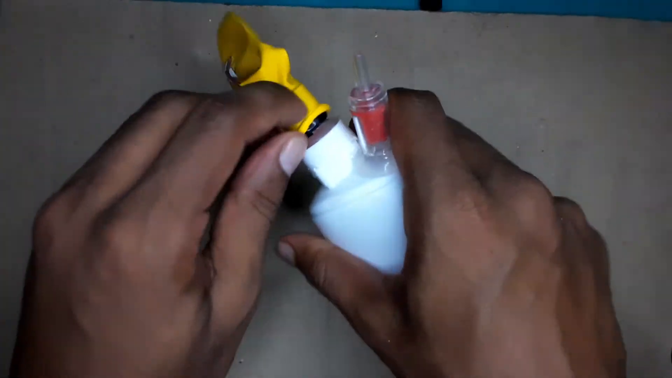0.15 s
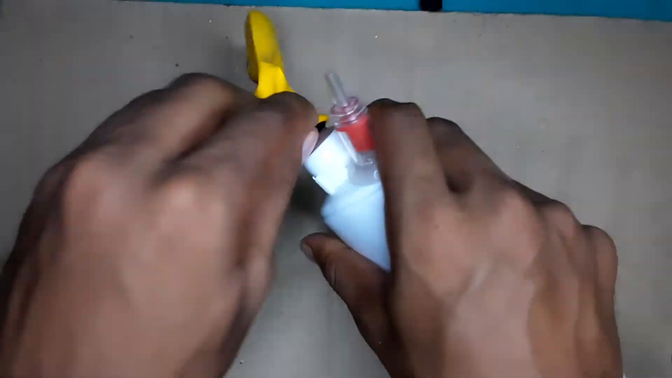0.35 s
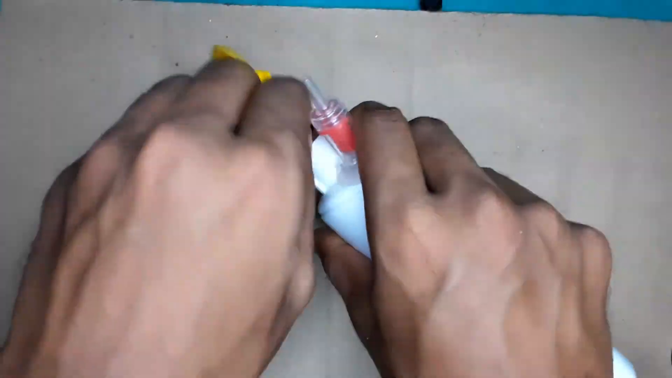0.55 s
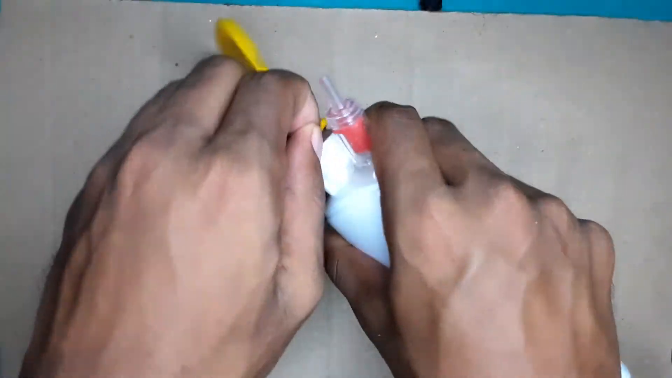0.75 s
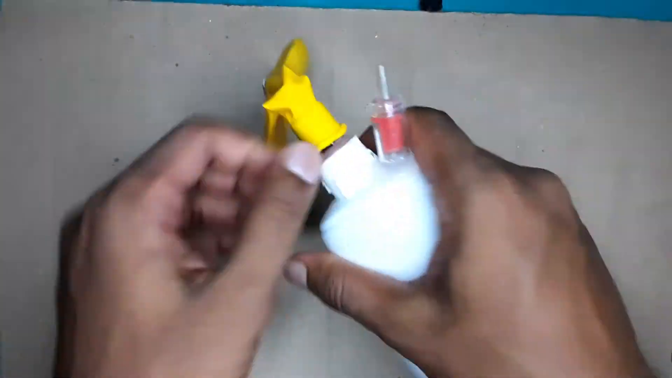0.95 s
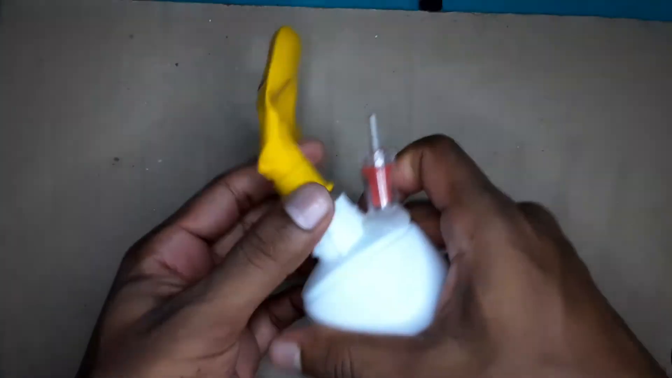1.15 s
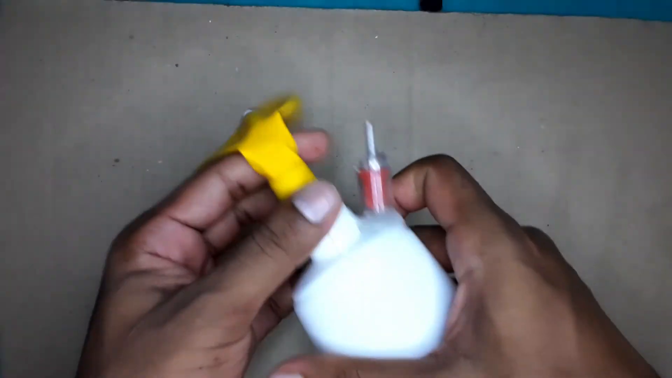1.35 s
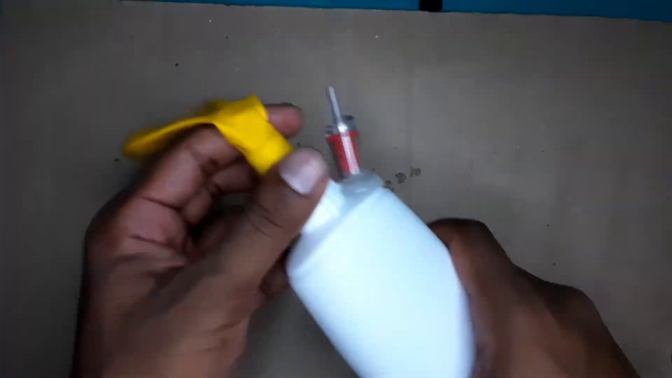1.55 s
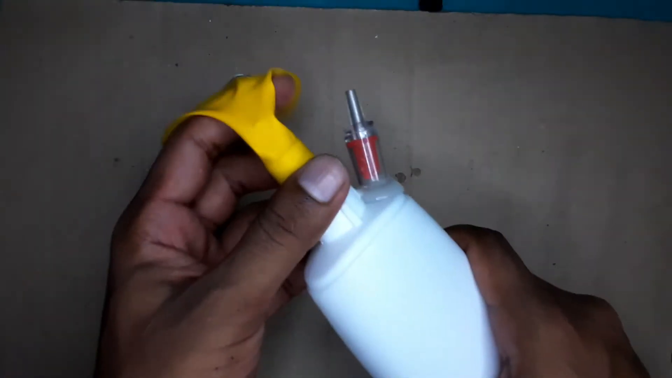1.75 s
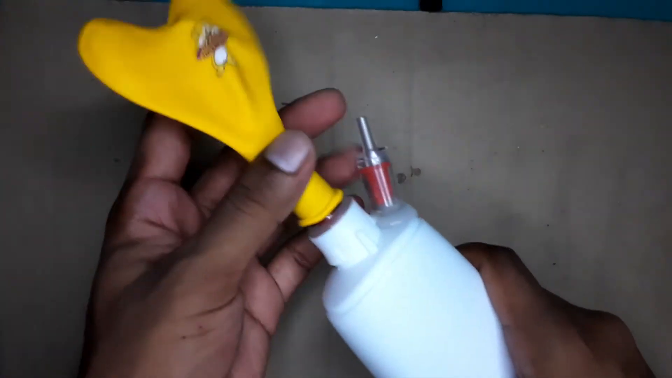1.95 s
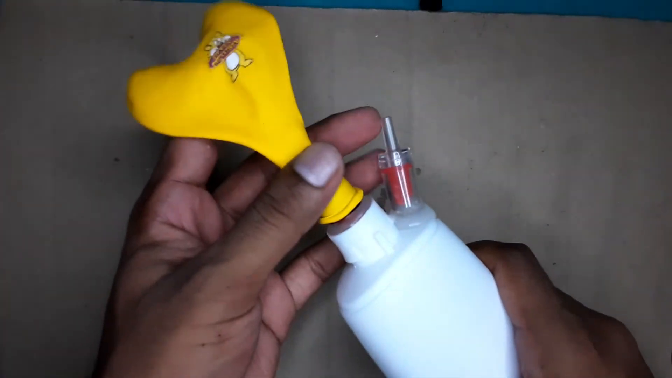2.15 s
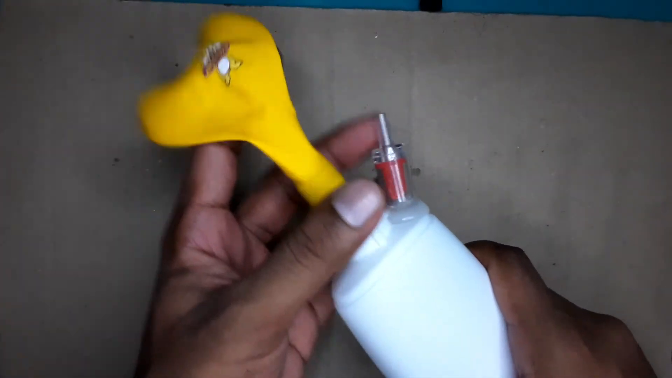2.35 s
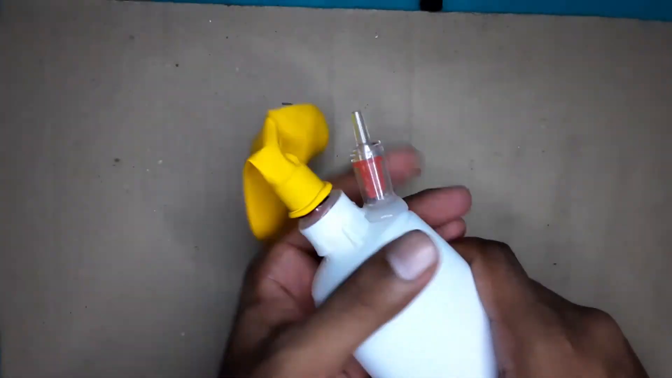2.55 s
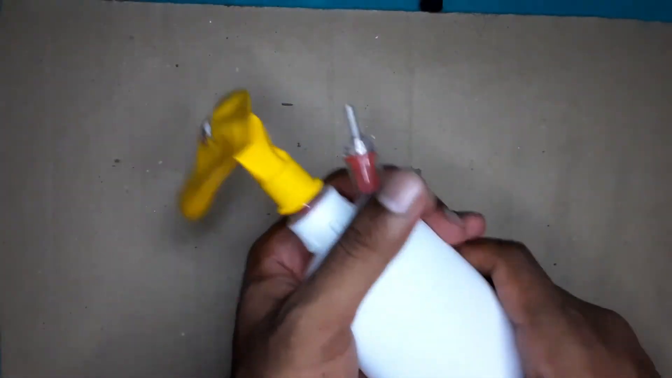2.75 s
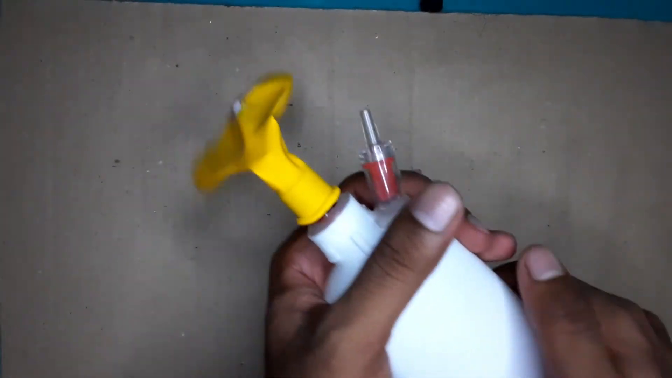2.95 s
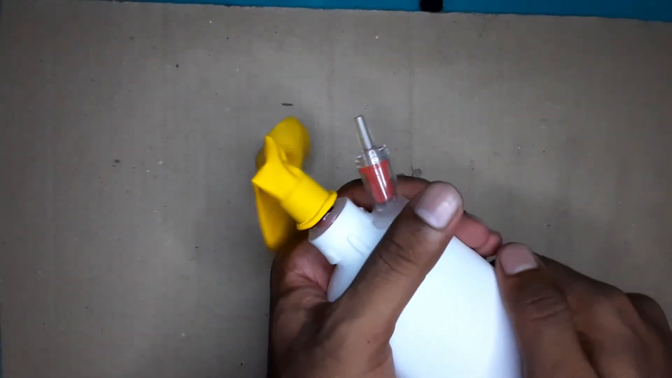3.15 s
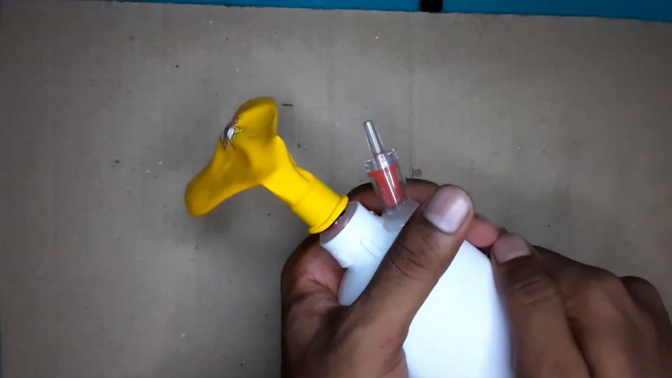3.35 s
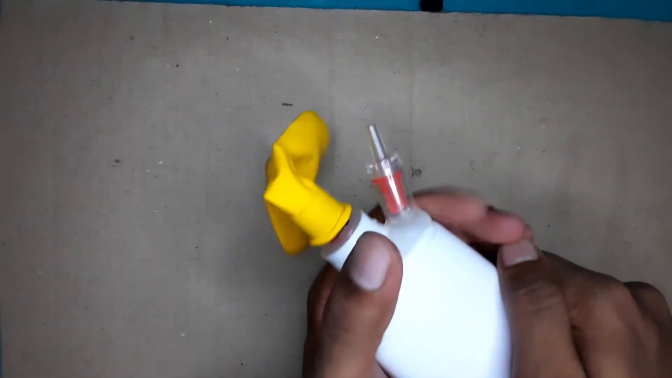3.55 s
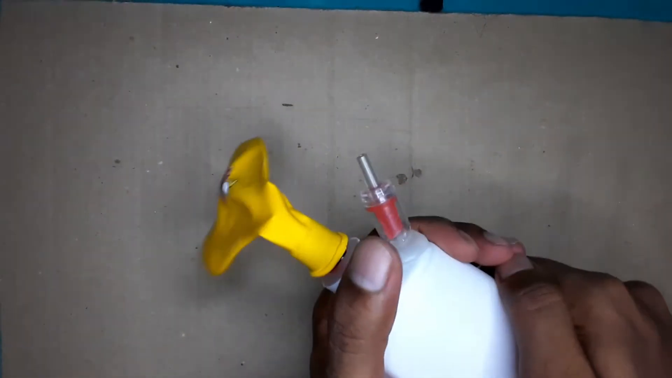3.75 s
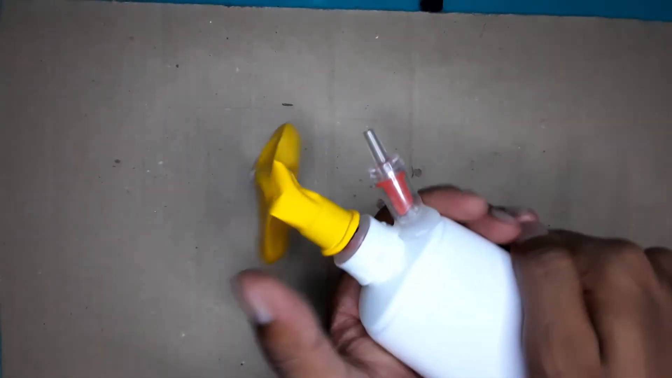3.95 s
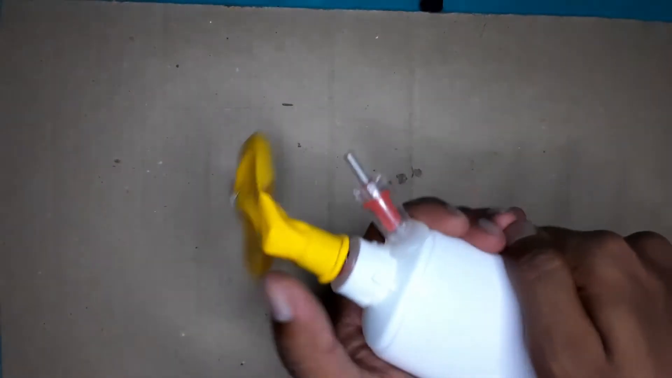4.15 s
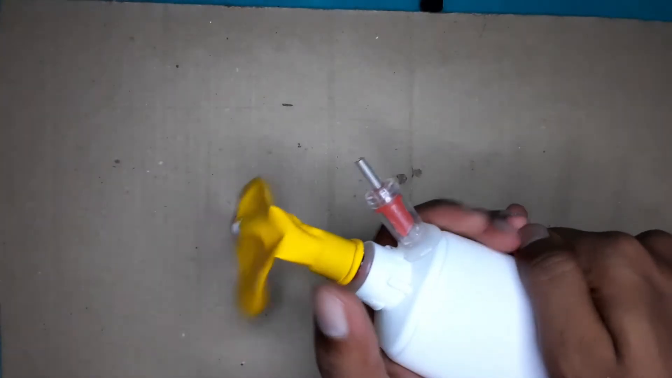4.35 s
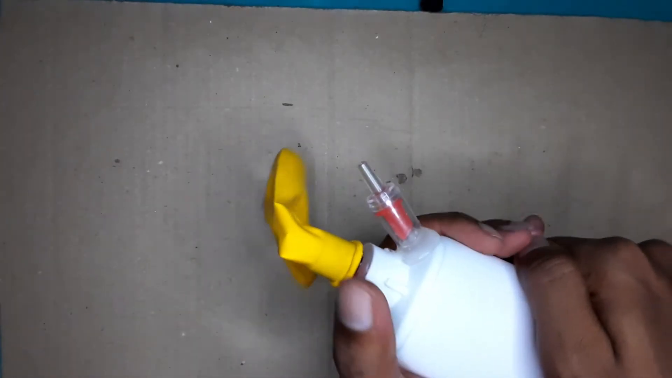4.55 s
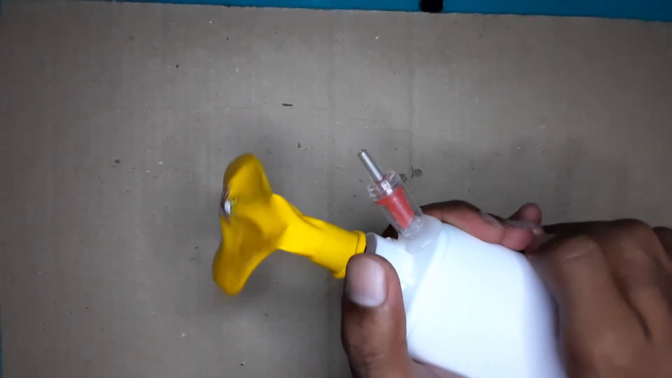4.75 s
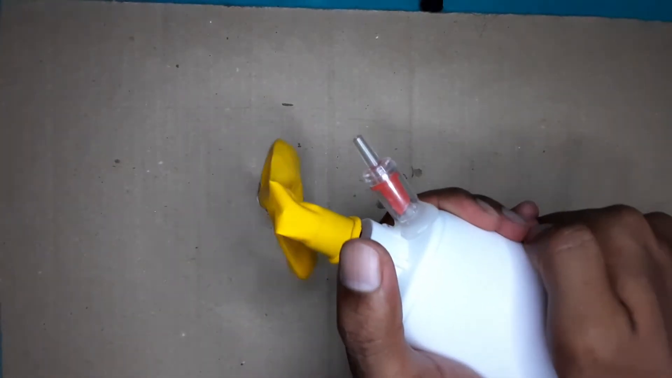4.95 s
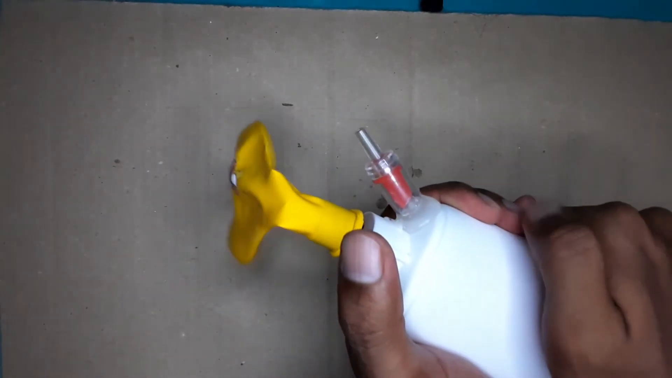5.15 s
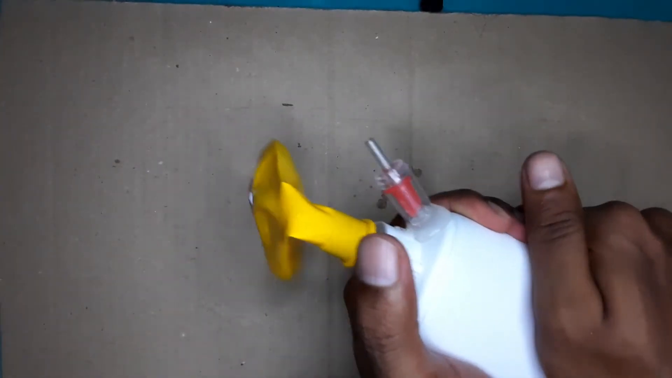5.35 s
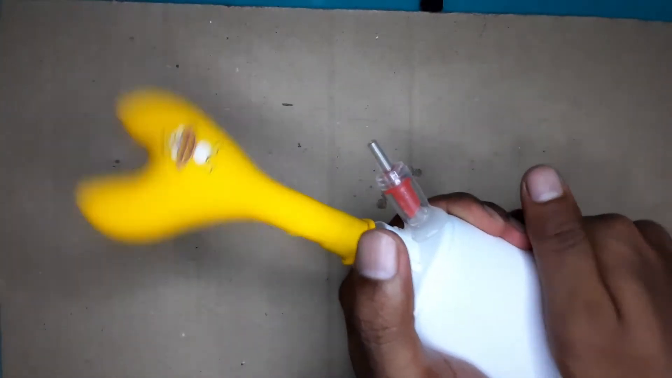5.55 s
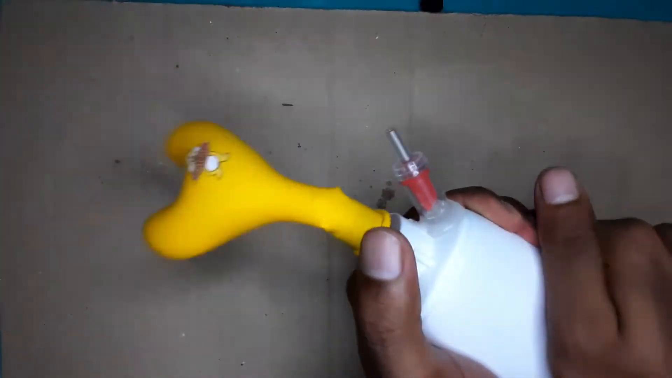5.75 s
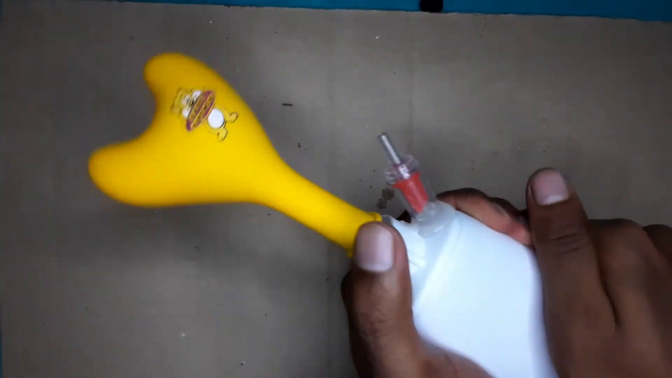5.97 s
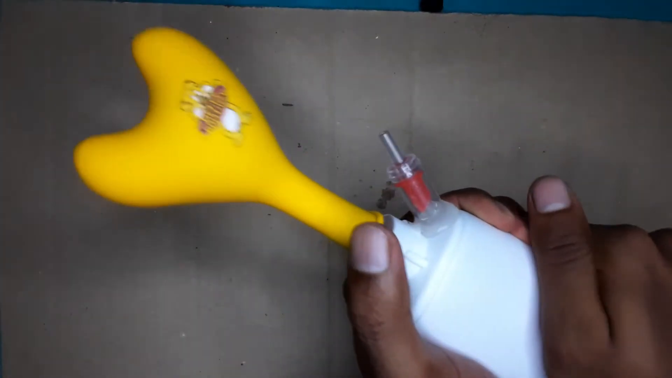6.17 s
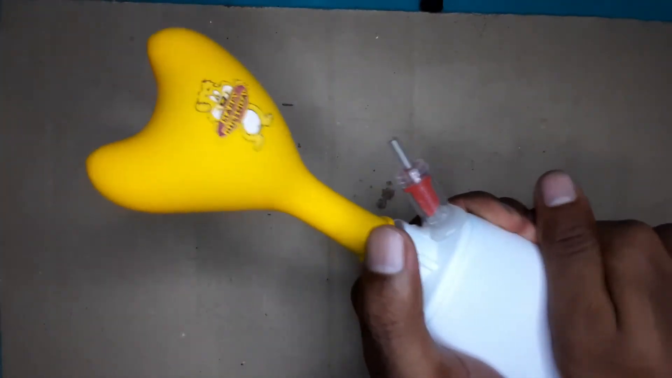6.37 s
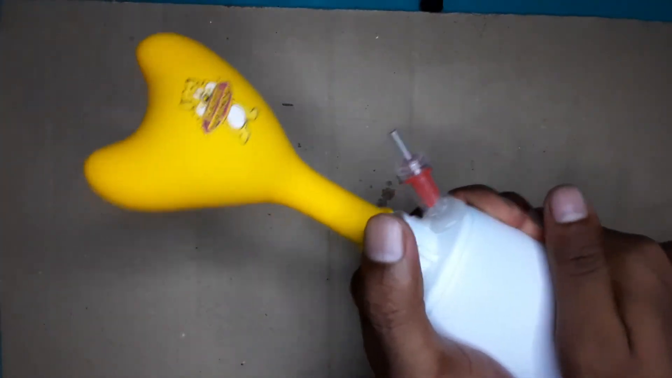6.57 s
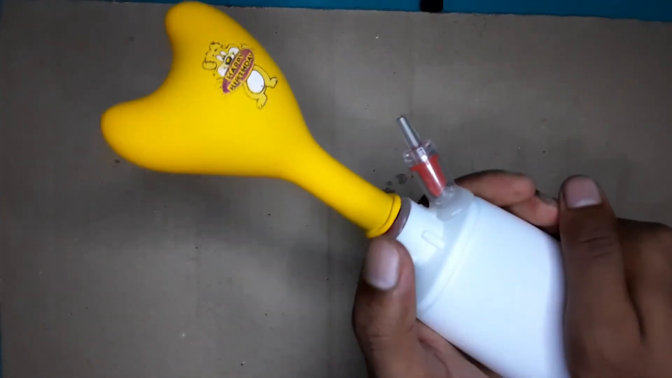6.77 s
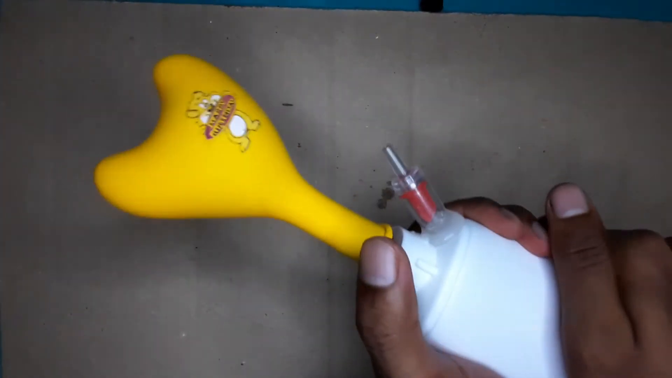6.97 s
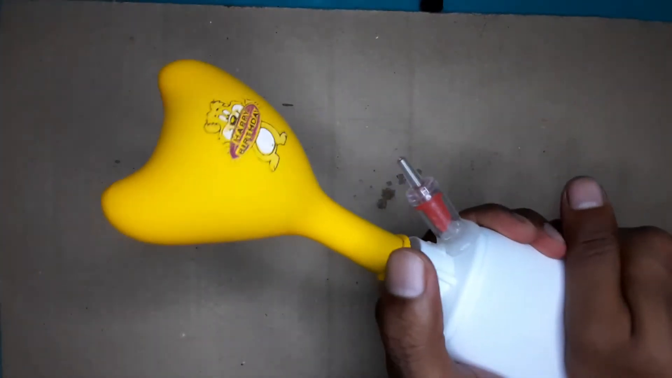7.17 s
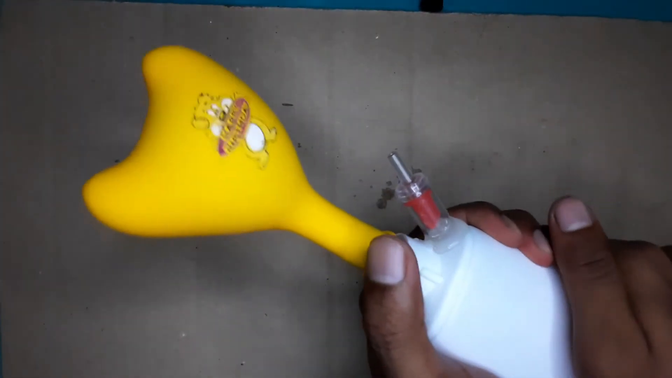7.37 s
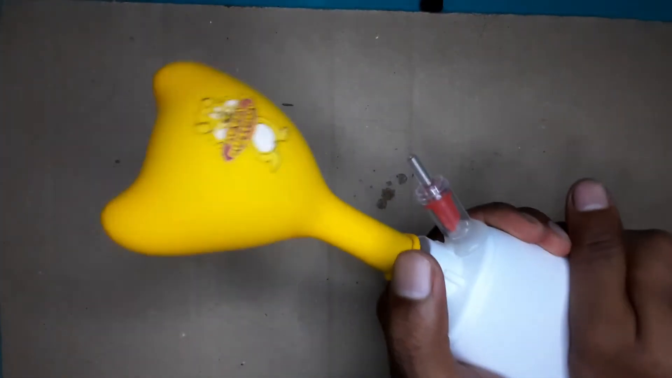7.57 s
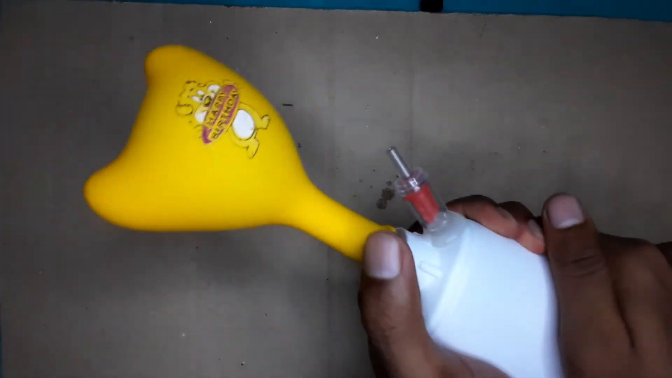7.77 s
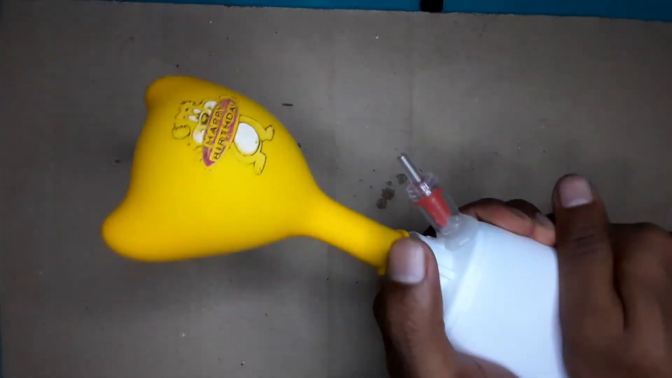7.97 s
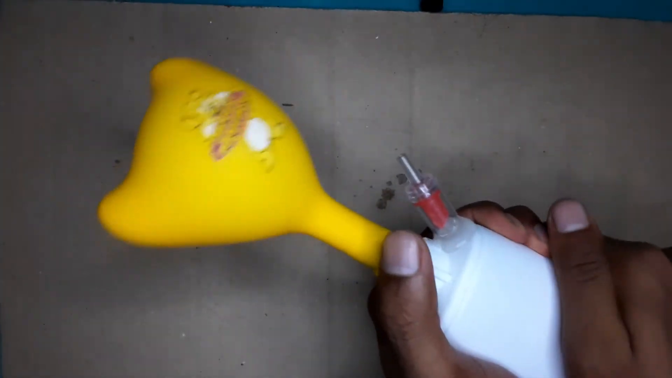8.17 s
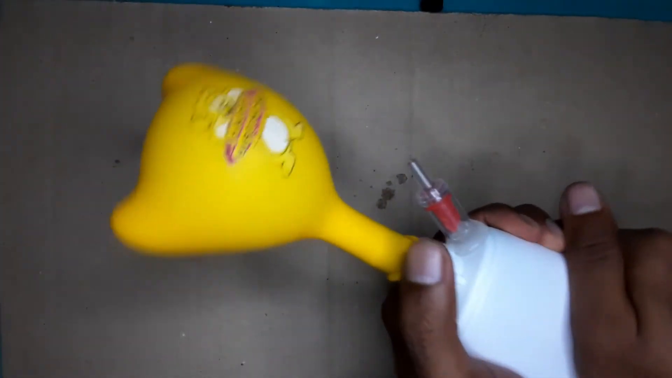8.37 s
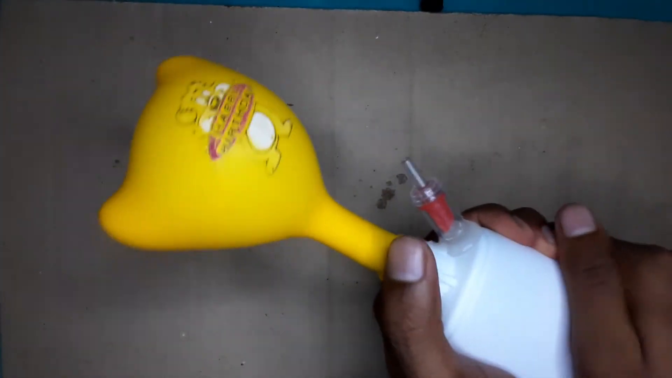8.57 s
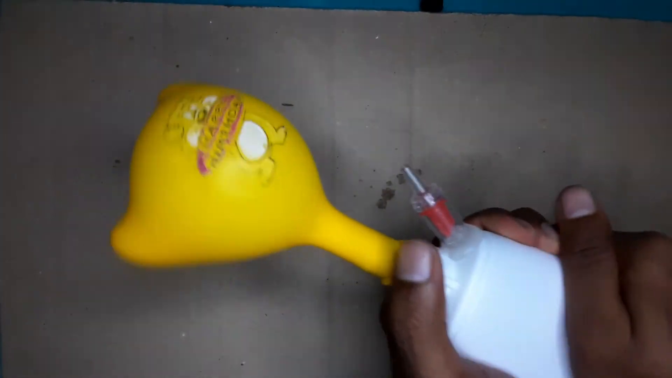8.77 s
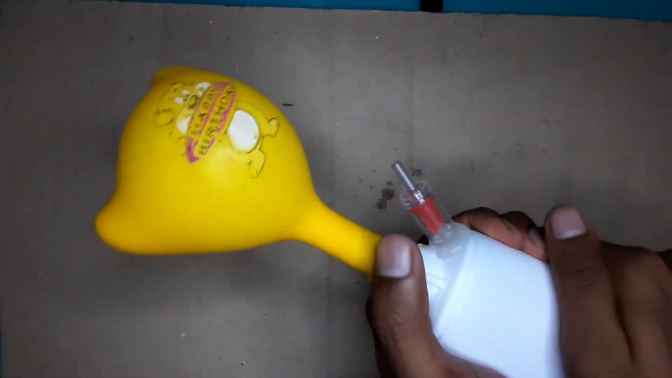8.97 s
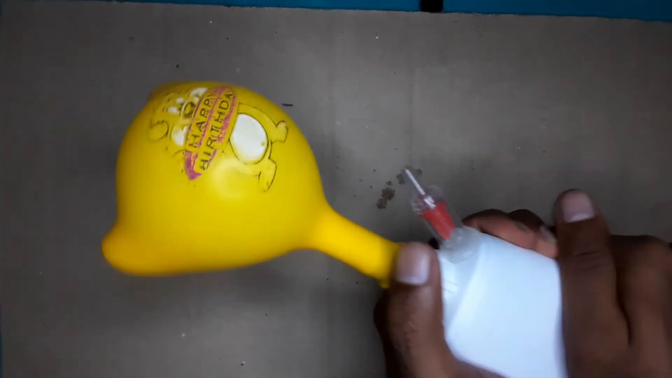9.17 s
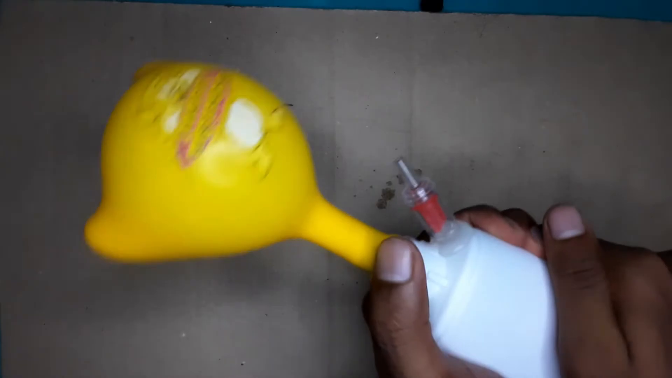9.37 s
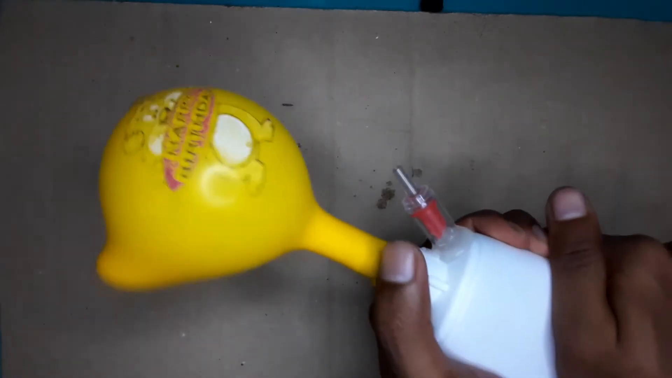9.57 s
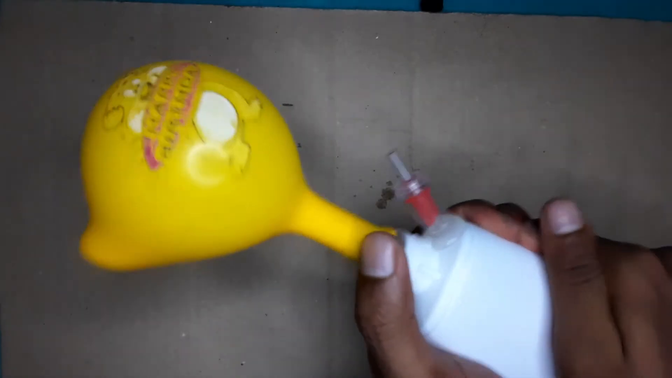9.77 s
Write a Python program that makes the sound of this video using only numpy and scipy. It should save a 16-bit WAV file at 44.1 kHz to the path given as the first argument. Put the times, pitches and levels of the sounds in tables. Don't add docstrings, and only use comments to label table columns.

```python
import sys
import numpy as np
from scipy import signal
from scipy.fft import rfft, irfft, next_fast_len
from scipy.io import wavfile
from scipy.ndimage import uniform_filter1d, map_coordinates

SR = 44100
rng = np.random.default_rng(int(sys.argv[2]) if len(sys.argv) > 2 else 0)


def materialize(psi):
    bounded = np.clip(np.atleast_2d(psi).T, -1, 1)
    quanta = np.round(bounded * 32767).astype(np.int16)
    wavfile.write(sys.argv[1], SR, quanta)


def invert_db(x):
    u = np.asarray(x, float) / 20
    return 10 ** u


N = 432621

# start t/s, stop t/s, nozzle level/dB, swell/dB, jet treble level/dB re nozzle
SQUEEZES = [(5.397, 5.461, -45, 4.5, 2), (5.428, 5.495, -40.5, 2.5, -0.5), (5.859, 5.96, -46.5, 2, 1.5),
            (6.31, 6.398, -46, 2, 4.5), (7.162, 7.259, -47.5, 1.5, 6.5), (7.559, 7.649, -44, 2.5, 4),
            (7.926, 8.03, -46, 0, 3), (8.314, 8.419, -44.5, 0.5, 2), (8.71, 8.806, -44.5, 0.5, 5),
            (9.101, 9.206, -46, 0, 7), (9.523, 9.624, -45, 2.5, 6.5)]
# f/Hz, level/dB
JET_FLOOR = [(700, -46), (1300, -26.5), (2500, -30.5), (3500, -7), (6500, -27), (9000, -18.5), (11500, -8),
             (15500, -40)]
# f/Hz, width/Hz, level/dB
CREASED = [(1710, 180, -11.5), (2500, 480, -13.5), (3300, 340, -4.5), (3900, 250, -5), (5600, 600, -13),
           (7600, 630, -8), (8860, 400, -6), (10800, 300, -9), (12000, 700, -6), (14200, 500, -5),
           (15300, 500, -5)]
# f/Hz, width/Hz, level/dB
LIMP = [(1800, 170, -13.5), (2360, 980, -9.5), (3370, 200, -7.5), (4150, 320, 0), (5050, 280, -4.5),
        (6130, 350, -5), (8400, 820, -11), (10100, 330, -7.5), (12100, 1200, -9.5), (14500, 3100, -5)]
# f/Hz small, f/Hz full, width/Hz, level/dB small, level/dB full
TAUT = [(1700, 1690, 200, -15.5, -21), (3486, 3420, 81, 0.5, 1.5), (4630, 4140, 75, -4.5, 0),
        (6180, 5570, 60, -10, -16.5), (7780, 7270, 150, -12.5, -12), (9260, 8720, 112, -14, -7.5),
        (11130, 10300, 70, 3, 1.5), (11250, 11280, 470, 2.5, 2.5), (11800, 11800, 350, -0.5, -5),
        (13600, 13000, 150, -7, -1.5), (14500, 14100, 700, -4.5, -8), (15600, 15400, 400, -4, -0.5)]
# level/dB at 3.5, 4.3, 7.5 and 10.5 kHz
GRIPS = [(-1, 0.5, 0, 0.5), (-0.5, 0.5, 0, 0.5), (-1.5, 0.64, -1, 0.5), (2, -0.5, 4.5, 0.5),
         (0, 0.5, -1, 0.5), (1, 1.1, -1, -0.5), (-1.5, 0.5, -3, 0.64), (-2, 0.64, 0, 0.5),
         (-2.5, 0.5, 0, -1.5)]
# valve opens t/s, flow fades from t/s, valve level/dB, whistle level/dB re valve
REFILLS = [(5.576, 5.69, -55.5, -1), (6.019, 6.136, -57, -0.5), (6.456, 6.562, -58.5, -1.5),
           (7.326, 7.426, -57.5, -0.5), (7.712, 7.806, -53.5, -4.5), (8.094, 8.209, -54.5, -3),
           (8.479, 8.587, -55, -3.5), (8.872, 9.002, -56.5, -1), (9.265, 9.386, -56.5, -3.5),
           (9.683, 9.783, -56, -3.5)]
# f/Hz, width/Hz, level/dB
VALVE = [(1242, 140, -13), (1560, 600, -14), (2480, 71, -15.5), (6020, 320, -15.5), (6800, 210, -8.5),
         (7170, 630, -6.5), (10840, 430, 2), (13500, 2050, -3), (15000, 760, 0)]
# f/Hz, level/dB
SUCK_FLOOR = [(700, -30), (1200, -23.5), (2800, -31.5), (5000, -22.5), (9000, -34), (12000, -12),
              (15800, -50)]
# t/s, f/Hz, level/dB
SEEPS = [
    [(5.376, 7900, -78), (5.41, 7500, -64)],
    [(5.385, 10500, -74), (5.41, 10800, -64)],
    [(5.49, 4220, -68), (5.535, 4340, -57), (5.57, 4270, -69)],
    [(6.98, 10400, -98), (7.02, 10800, -74.5), (7.038, 11000, -89.5), (7.08, 10500, -104),
     (7.098, 10600, -87), (7.13, 10500, -98)],
    [(6.97, 6700, -95), (7.0, 6950, -92), (7.1, 7170, -96), (7.14, 6800, -101)],
]
# start t/s, length t/s, rubber level/dB, skin level/dB re rubber
RUBS = [(0, 3.3, -89.5, -1.5), (2.597, 2.25, -88.5, 3), (0, 0.12, -82.5, -2.1), (0.085, .125, -67.5, -6),
        (0.199, 0.059, -71, -23), (0.293, 0.13, -78, -28), (0.62, 0.12, -70.5, -7), (0.701, 0.15, -78, 2),
        (0.906, 0.039, -64.5, 4.5), (0.939, .073, -77, 5), (1.12, 0.21, -82, -1), (1.229, 0.39, -75, -10),
        (1.424, .12, -61.5, -6), (1.508, 0.12, -56.5, -2), (1.805, 0.24, -77.5, 0),
        (2.685, 0.13, -79, -2.1), (2.79, 0.037, -59, -21), (2.826, 0.11, -56.5, -5.5),
        (2.961, 0.18, -74.5, -6), (3.245, 0.23, -73.5, -18), (3.459, 0.11, -72.5, -11),
        (3.65, 0.13, -75.5, -15), (3.85, 0.35, -80.5, -4), (4.2, .12, -75.5, -7), (4.357, 0.25, -77.5, 2),
        (4.654, 0.24, -76.5, -6), (6.523, .076, -61, -12), (6.662, 0.14, -75.5, -6),
        (6.763, .12, -67.5, -2)]
# start t/s, length t/s, level/dB, f/Hz set by the grip
DRAGS = [(0.102, .13, -79, 2476), (0.129, 0.058, -75.5, 1687), (0.446, .058, -80, 2350),
         (0.618, 0.28, -83.5, 2130), (0.611, 0.18, -85, 1590), (0.907, 0.048, -71, 1600),
         (0.909, 0.062, -77, 2340), (1.126, 0.093, -91, 2480), (1.431, 0.07, -81, 2550),
         (1.5, 0.15, -76.5, 2500), (.21, .16, -88, 2450), (1.24, .14, -88, 2250), (2.04, .3, -90, 2100),
         (1.84, 0.15, -77, 2080), (2.788, 0.046, -70, 2130), (2.821, 0.12, -71.5, 2190),
         (3.456, .12, -92, 2140), (3.636, 0.16, -87, 2060), (4.229, 0.061, -79.5, 2080),
         (4.361, 0.032, -78, 2210), (4.459, 0.074, -84, 2020), (4.65, 0.12, -81.5, 2010),
         (6.527, 0.092, -71, 2130), (6.786, .08, -74, 1920)]
# start t/s, length t/s, level/dB, f/Hz
NECK = [(.1, .1, -84, 3560), (0.621, 0.091, -79, 3590), (.725, .1, -82, 3550), (1.25, .13, -82, 4900),
        (1.51, .12, -72, 3050), (1.812, 0.048, -82, 5100), (2.7, 0.061, -88, 3500), (2.829, .09, -71, 3500),
        (2.83, .11, -69, 2750), (3.255, 0.047, -80, 3620), (3.36, .07, -81, 3600),
        (3.506, 0.032, -78, 3670), (3.697, 0.042, -80, 3550), (4.359, 0.054, -84, 3480),
        (4.658, 0.19, -87, 3540), (6.789, 0.067, -78, 3500)]
# f/Hz, width/Hz, level/dB
WALL = [(1720, 74, -20.5), (2550, 160, -11)]
# f/Hz, width/Hz, level/dB
RUBBER = [(3610, 160, -6), (5070, 2200, -5), (5320, 1100, -1), (6950, 1460, 2)]
# f/Hz, level/dB
SKIN = [(8000, -17.5), (9300, -7), (10500, 3.5), (12500, 5.5), (15800, 14)]
# t/s, peak level/dB, f/Hz
SNAPS_AND_TAPS = [(.1221, -63, 7180), (.1356, -51, 4290), (.1974, -50, 5150), (.629, -53, 5420), (0.727, -62, 3510),
                  (.7696, -64, 3560), (0.795, -56, 5940), (.8126, -57, 5460), (1.4422, -50, 5300),
                  (1.8936, -62, 7250), (2.043, -64, 7240), (2.102, -63, 5600), (3.3348, -67, 6980),
                  (3.481, -64, 7080), (4.2652, -56, 7340), (4.59, -65, 7320), (4.6658, -65, 3490),
                  (0.309, -59.5, 4150), (0.3661, -61, 3550), (0.622, -56, 5410), (0.651, -48, 5570),
                  (0.6705, -50, 5600), (0.9114, -53, 7200), (1.2445, -56.5, 7240), (2.6954, -50, 7400),
                  (2.7814, -52, 5130), (2.844, -47, 6950), (3.255, -62, 3530), (3.5084, -54.5, 7340),
                  (3.6541, -64, 6850), (4.367, -50.5, 7100), (4.426, -54, 7300), (4.446, -51, 5800),
                  (4.81, -62, 7050), (5.5754, -42, 3620), (6.136, -51, 3800), (6.234, -50.5, 5200),
                  (6.5735, -36.5, 3800), (6.684, -56, 7100), (6.9168, -61, 7100), (6.974, -63.5, 4630),
                  (6.533, -52, 2400), (6.5535, -45, 2450), (6.5735, -46, 2200), (6.581, -49, 2900),
        (6.5865, -48, 3300), (6.586, -48.5, 1500), (5.5, -52.5, 1500), (5.576, -47.5, 1900),
        (6.6085, -49, 4900), (6.811, -47, 3900), (7.083, -73, 4000), (.9193, -47.5, 4600),
        (2.793, -39.5, 4800), (2.8295, -44.5, 3300), (3.5, -48.5, 6000), (1.1767, -64, 4870)]
# t/s, peak level/dB, f/Hz
TICKS = [(.1211, -72, 2580), (.1401, -65, 1680), (.3601, -71, 2480), (.4549, -74, 2390), (.4673, -69, 2360),
         (.4798, -68, 2590), (.621, -69, 1660), (.622, -71, 2120), (.6509, -63, 1570), (.652, -70, 2140),
         (.6814, -69, 2110), (.6825, -67, 1600), (.7262, -66.5, 2180), (.7562, -66, 1570),
         (.7766, -59, 1630), (.7975, -67, 2280), (.8133, -67, 1570), (.9108, -62, 2300), (.9158, -63, 1605),
         (.9198, -55, 1620), (.9205, -58, 2290), (.939, -68, 2280), (1.1353, -74, 2450),
         (1.1772, -72, 2480), (1.4386, -68, 2580), (1.5309, -67, 2600), (1.5718, -61, 2480),
         (2.0413, -71, 2610), (2.6953, -71, 2130), (2.7165, -71, 2100), (2.7925, -44.5, 2160),
         (2.8305, -54, 2000), (2.8445, -54, 1980), (3.254, -76, 2130), (3.5094, -70, 2150),
         (3.6975, -58, 2060), (4.2243, -73, 2090), (4.2443, -69, 2040), (4.2652, -60, 2124),
         (4.366, -66, 2180), (4.4243, -75, 1980), (4.4468, -71, 2150), (4.4757, -67, 2040),
         (4.4872, -61, 2080), (4.6658, -71, 1850), (4.6882, -64, 1880), (4.7122, -75, 2020),
         (6.7955, -62.5, 1845), (6.81, -57, 2150)]
# t/s, peak level/dB
KNOCKS = [
    (.67, -73),
    (2.7927, -53),
    (2.83, -71),
    (6.5735, -58),
]
# t/s, peak level/dB, f/Hz
FLEX = [(5.53, -56.5, 498), (5.45, -55, 420), (6.1, -58, 336), (6.135, -52.5, 352), (6.674, -56.5, 310),
        (7.88, -56, 480), (6.232, -62, 464), (6.502, -59, 350), (7.078, -67, 371), (7.394, -53, 389),
        (7.781, -55, 311), (8.156, -52, 400), (8.251, -63, 418), (8.542, -50, 364), (8.949, -52.5, 316),
        (9.336, -51, 352), (9.462, -64, 342), (9.766, -51.5, 366)]
# f/Hz, T60 t/s
ROOM = [(300, 0.81), (2000, 0.23), (6000, 0.14), (14000, 0.2)]
# multiple of the blade rate, rms level/dB
FAN = [(4, -75), (5.5, -77.5), (7, -78), (8, -78), (9, -72), (10, -60), (11, -71), (12, -80), (12.5, -83),
       (24, -75), (30, -80)]
# t/s, f/Hz, level/dB
DRONE = [(0, 75.6, -69.5), (2.5, 75.2, -65.5), (3.6, 75.8, -61.5), (4.05, 75.3, -71), (4.499, 74.95, -60.5),
         (7.5, 75.34, -58.5), (9.81, 75, -59.5)]
# t/s, f/Hz, level/dB
MAINS = [(0, 99.4, -75.5), (2.5, 100, -69.5), (4, 100.5, -74.5), (6.2, 100, -74), (6.45, 100, -62.5),
         (7.8, 101.9, -63), (8.6, 100.3, -73), (9.81, 99.4, -78)]
# f/Hz, density level/dB per Hz
RUMBLE = [(18, -120), (34, -104), (46, -88.5), (60, -85.5), (130, -83), (180, -88), (300, -90),
          (480, -98.5), (620, -104), (800, -118), (1100, -124), (1500, -140)]
# f/Hz, density level/dB per Hz
HISS = [(500, -130), (1100, -121), (2300, -125.5), (5000, -129), (7500, -129), (8300, -138), (9800, -137),
        (10800, -129), (15800, -127)]

UNFOLDED_S = 5.8
FILL_STROKES = 3.7
LIMP_RISE_S, TAUT_RISE_S = 0.029, 0.013
LIMP_CAVITY_DB, SMALL_CAVITY_DB, FULL_CAVITY_DB = -46.5, -51.5, -56.5
SMEAR_HZ = 60
FADE_S, REFILL_CAVITY_DB = .122, -63.5
RUB_WALL_DB = -11.5
WALL_BAND_HZ = (500, 2660)
STROKE_PHASE = np.array([0, .2, .7, 1, 1.4])
STROKE_DB = np.array([-4.0, 2.0, 2.5, -12.0, -23.5])
TICK_T60_S, TICK_RISE_S = 0.026, 0.00055
BLADE_HZ = 12.655
STRIKE_T = np.arange(SR // 8) / SR


def squeezes():
    out, strokes = 0, 0
    jet = turbulence(flutter_db=1.7, rate=420, patch_db=2.3)
    for start, stop, db, swell_db, treble_db in SQUEEZES:
        if start > UNFOLDED_S:
            full = 1 - np.exp(-strokes / FILL_STROKES)
            modes = taut_modes(full, GRIPS[strokes])
            rise = TAUT_RISE_S
            cavity_db = SMALL_CAVITY_DB + (FULL_CAVITY_DB - SMALL_CAVITY_DB) * full
            strokes += 1
        else:
            modes = CREASED if start == SQUEEZES[0][0] else LIMP
            rise, cavity_db = LIMP_RISE_S, LIMP_CAVITY_DB
        broad = [(c, w + SMEAR_HZ, g + rng.normal(0, 1.2)) for c, w, g in modes]
        shape = [(start - .004, -36), (start + rise / 2, -6.5 - swell_db),
                 (start + 1.69 * rise, -swell_db), (stop - .012, 0),
                 (stop + 0.005, -13), (stop + .09, -32)]
        rows = [(s, db + g, treble_db, cavity_db - db) for s, g in shape]
        bands = [(2900, 7700), (6700, 14800), (610, 2170)]
        out = out + played(rows, jet, lambda hz: humps(broad, hz, JET_FLOOR), bands)
    return out


def taut_modes(full, grip):
    grip_db = dict(zip((1, 2, 4, 6), grip))
    modes = []
    for k, (small_hz, full_hz, width_hz, small_db, full_db) in enumerate(TAUT):
        hz = small_hz + (full_hz - small_hz) * full
        db = small_db + (full_db - small_db) * full
        modes.append((hz, width_hz, db + grip_db.get(k, 0)))
    return modes


def refills():
    air, out = turbulence(flutter_db=-0.5, rate=640, patch_db=2.0), 0
    flutter = invert_db(2.5 * wobble(60))
    whistle_hz, width_hz, gain_db = VALVE[6]
    hiss_modes = VALVE[:6] + [(10500, 440, -15.0)] + VALVE[7:]
    bands = [(3150, 9500), (10300, 12200), (605, 4500)]
    sag = np.array([.018, .01, 0, -.008, -.008, -.004])
    for start, knee, db, whistle_db in REFILLS:
        stop, cavity_db = knee + FADE_S, REFILL_CAVITY_DB - db
        rows = [(start, db - 16, -4, cavity_db),
                (start + .018, db - 5.5, -3, cavity_db),
                ((start + knee) / 2, db, -2.5, cavity_db),
                (knee, db - 3.5, -3, cavity_db + 1.5),
                (stop, db - 27.0, -6, cavity_db),
                (stop + 0.036, db - 35, -6, cavity_db)]
        out = out + played(rows, air, lambda hz: humps(hiss_modes, hz, SUCK_FLOOR), bands)
        level = db + whistle_db + gain_db + np.array([-12, -7, -4, -1.0, -24.5, -29])
        out = out + flutter * warble(np.transpose(rows)[0], whistle_hz * (1 + sag), level, width_hz)
    return out


def seeps():
    return sum(warble(*np.transpose(rows), width_hz=230) for rows in SEEPS)


def rubs():
    out = 0
    for start, length, db, skin_db in RUBS:
        rows = [(start + length * u, db + g, skin_db, RUB_WALL_DB) for u, g in zip(STROKE_PHASE, STROKE_DB)]
        bands = [(3100, 7440), (8000, 13200), WALL_BAND_HZ]
        out = out + 0.42 * played(rows, friction, contact_colour, bands)
    return out


def drags():
    jerks = (rng.random(N) < 90 / SR) * invert_db(2.5 * rng.standard_normal(N))
    chatter = unit(1.2 + signal.lfilter([1], [1, -np.exp(-1 / (.006 * SR))], jerks))
    glide = np.array([1.02, 1.01, 1, .98, .97])
    note_db = STROKE_DB + np.array([-6, -2, -2, -5, -10])
    out = 0
    for start, length, db, wall_hz in DRAGS:
        s = start + length * STROKE_PHASE
        rows = np.transpose([s, db + STROKE_DB])
        out = out + 0.54 * chatter * played(rows, friction, contact_colour, [WALL_BAND_HZ])
        out = out + chatter * warble(s, wall_hz * glide, db + note_db, width_hz=420)
    for start, length, db, neck_hz in NECK:
        s = start + length * STROKE_PHASE
        out = out + chatter * warble(s, np.full(5, neck_hz), db + STROKE_DB, width_hz=600)
    return out


def friction(size):
    slips = (rng.random(size) < 1500 / SR) * invert_db(1.8 * rng.exponential(size=size))
    slips = slips * rng.standard_normal(size)
    rustle = invert_db(1.5 * wobble(60, size)) * rng.standard_normal(size)
    return patchy(.4 * unit(slips) + rustle, 2.5, size=10)


def contact_colour(hz):
    return humps(WALL + RUBBER, hz, [(500, -2), (1200, -23.5), (2900, -12.5), (7700, -1.0)] + SKIN)


def snaps_and_taps():
    blows = []
    for s, db, hz in SNAPS_AND_TAPS:
        crack = puff(.027, [(500, -25), (hz / 1.4, -12), (hz, 0), (min(hz * 1.3, 7600), -12),
                            (7700, -15), (8700, -22), (11000, -16)])
        ping = min(1500 / hz, .8) * ring(hz, 45 / hz)
        blows.append((s, invert_db(db - 4.5) * (ping + 0.45 * crack)))
    return struck(blows)


def ticks():
    blows = []
    for s, db, hz in TICKS:
        grit = 1 + .45 * wobble(300, len(STRIKE_T))
        rise = 1 - np.exp(-STRIKE_T / TICK_RISE_S)
        blows.append((s, invert_db(db + 1.0) * grit * ring(hz, TICK_T60_S) * rise))
    return struck(blows)


def knocks():
    body = ring(632, 0.09) + 0.9 * ring(420, 0.07)
    return struck([(s, invert_db(db) * body) for s, db in KNOCKS])


def flexes():
    blows = []
    for s, db, hz in FLEX:
        creak = .4 * ring(hz, 0.08) + 0.45 * puff(0.09, [(200, -15), (330, 6), (600, 0), (1000, -20)])
        blows.append((s, invert_db(db + 3.5) * creak * (1 - np.exp(-STRIKE_T / 0.0033))))
    return struck(blows)


def room(x):
    hz, t, z = signal.stft(rng.standard_normal(SR // 2), SR, nperseg=256)
    tail = signal.istft(z * invert_db(-60 * t / along(ROOM, hz)[:, None]), SR, nperseg=256)[1]
    return signal.fftconvolve(np.pad(x, (250, 0)), tail / np.linalg.norm(tail))[:N]


def fan():
    t = np.arange(N) / SR
    turn = 2 * np.pi * np.cumsum(BLADE_HZ * (1 + 0.000523 * wobble(0.597))) / SR
    hum = 0
    for k, db in FAN:
        unsteady = .8 if k == 10 else 3.5
        level = invert_db(db + 2.5 + unsteady * wobble(1.6))
        hum = hum + level * np.sin(k * turn + .25 * unsteady * wobble(1.2))
    throb = 1 + 1.2 * np.cos(2 * np.pi * 4.18 * t + 1.58)
    return hum + invert_db(-69.0 + 1.3 * wobble(1.0)) * throb * np.sin(16 * turn)


def motor_tone(s, hz, db):
    t = np.arange(N) / SR
    turn = 2 * np.pi * np.cumsum(np.interp(t, s, hz)) / SR
    return invert_db(np.interp(t, s, db) + 0.78 * wobble(2.6)) * np.sin(turn)


def steady_noise(spectrum):
    return filtered(rng.standard_normal(N), lambda hz: np.sqrt(SR / 2) * invert_db(along(spectrum, hz)))


def background():
    drone = motor_tone(*np.transpose(DRONE)) + motor_tone(*np.transpose(MAINS))
    rumble = invert_db(0.26 * wobble(7.9)) * steady_noise(RUMBLE)
    return fan() + drone + rumble + steady_noise(HISS)


def turbulence(flutter_db, rate, patch_db):
    def source(size):
        noise = invert_db(flutter_db * wobble(rate, size)) * rng.standard_normal(size)
        return patchy(noise, patch_db, size=8)
    return source


def played(rows, source, gain, bands):
    s, first, *rest = np.transpose(rows)
    start, t = span(s)
    raw, out = source(len(t)), 0
    for (lo, hi), db in zip(bands, [first] + [first + r for r in rest]):
        def band_gain(hz):
            return gain(hz) / np.sqrt((1 + (lo / (hz + 1)) ** 12) * (1 + (hz / hi) ** 12))
        out = out + invert_db(np.interp(t, s, db)) * unit(filtered(raw, band_gain))
    return placed(out, start)


def warble(s, hz, db, width_hz):
    start, t = span(s)
    turn = 2 * np.pi * np.cumsum(np.interp(t, s, hz)) / SR
    band = wobble(width_hz, len(t)) * np.sin(turn) + wobble(width_hz, len(t)) * np.cos(turn)
    return placed(invert_db(np.interp(t, s, db)) * unit(band), start)


def ring(hz, t60):
    return invert_db(-60 * STRIKE_T / t60) * np.sin(2 * np.pi * hz * STRIKE_T)


def puff(t60, spectrum):
    noise = rng.standard_normal(len(STRIKE_T))
    return invert_db(-60 * STRIKE_T / t60) * unit(filtered(noise, lambda f: invert_db(along(spectrum, f))))


def struck(blows):
    out = np.zeros(N + SR)
    for s, sound in blows:
        out[round(s * SR):][:len(sound)] += sound
    return out[:N]


def patchy(x, patch_db, size):
    z = signal.stft(x, nperseg=256)[2]
    field = uniform_filter1d(rng.standard_normal(z.shape), 2, axis=0)
    field = uniform_filter1d(field, size=size, axis=1)
    return signal.istft(z * invert_db(patch_db * unit(field)), nperseg=256)[1][:len(x)]


def humps(modes, hz, between):
    power = sum(invert_db(2 * db) / (1 + (2 * (hz - c) / w) ** 2) ** 2 for c, w, db in modes)
    return np.sqrt(power + invert_db(2 * along(between, hz)))


def filtered(x, gain):
    m = next_fast_len(len(x) + 8192)
    return irfft(rfft(x, m) * gain(np.fft.rfftfreq(m, 1 / SR)), m)[:len(x)]


def along(points, hz):
    f, v = np.transpose(points)
    return np.interp(np.log(hz + 1), np.log(f + 1), v)


def wobble(rate, size=N):
    grid = np.arange(0, size + SR / rate, max(SR / rate / 16, 1))
    knots = rng.standard_normal(int(size * rate / SR) + 4)
    return np.interp(np.arange(size), grid, map_coordinates(knots, [grid * rate / SR]))


def unit(x):
    return x / np.sqrt(np.mean(x ** 2) + 1e-20)


def span(s):
    start = round(s[0] * SR)
    return start, np.arange(start, min(round(s[-1] * SR), N)) / SR


def placed(x, start):
    k = np.arange(len(x))
    soft = np.clip(np.minimum(k, k[::-1]) / (0.00078 * SR), 0, 1)
    return np.pad(x * soft, (start, N - start - len(x)))


def scene():
    pump = squeezes() + refills() + seeps()
    touch = rubs() + drags() + snaps_and_taps() + ticks() + knocks() + flexes()
    echo = room(invert_db(-8.0) * pump + invert_db(-10.5) * touch)
    return (pump + touch + echo + background())[None]


def band_limit(x):
    return signal.sosfilt(signal.butter(12, 15850, fs=SR, output="sos"), x)


def record(dry):
    return band_limit(dry)


dry = scene()
out = record(dry)
materialize(out)
```